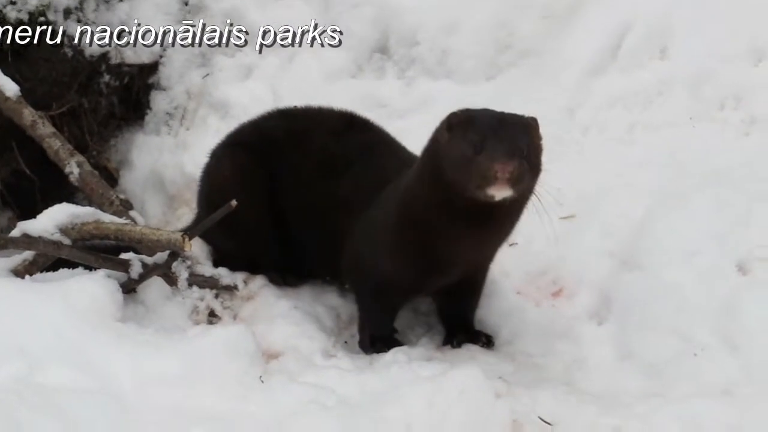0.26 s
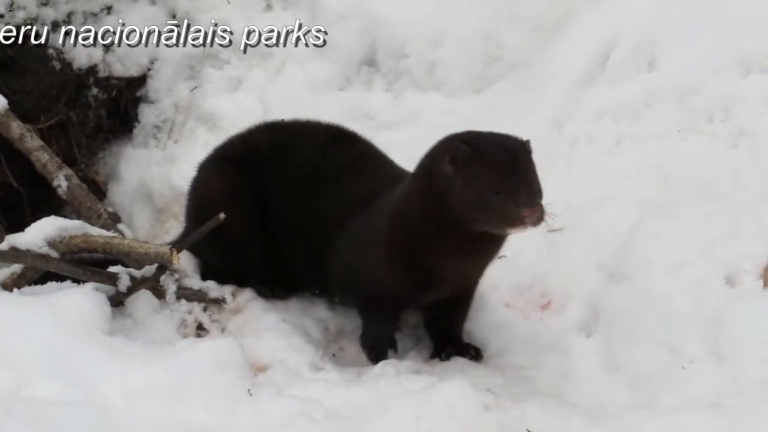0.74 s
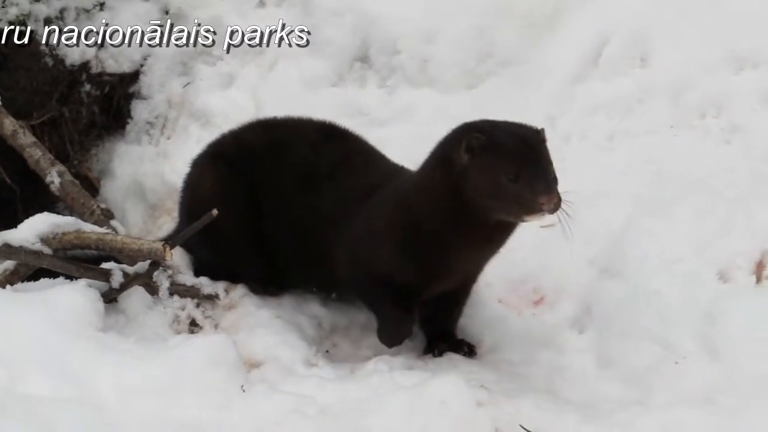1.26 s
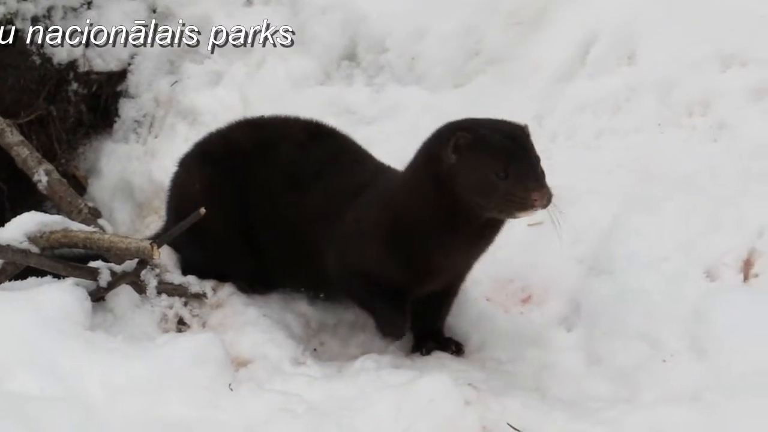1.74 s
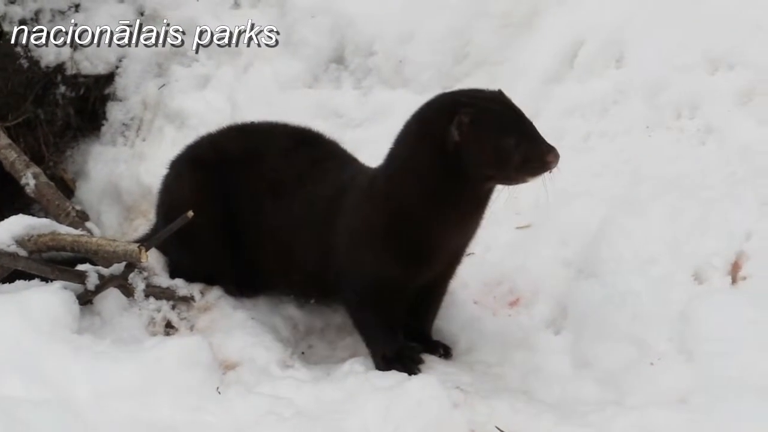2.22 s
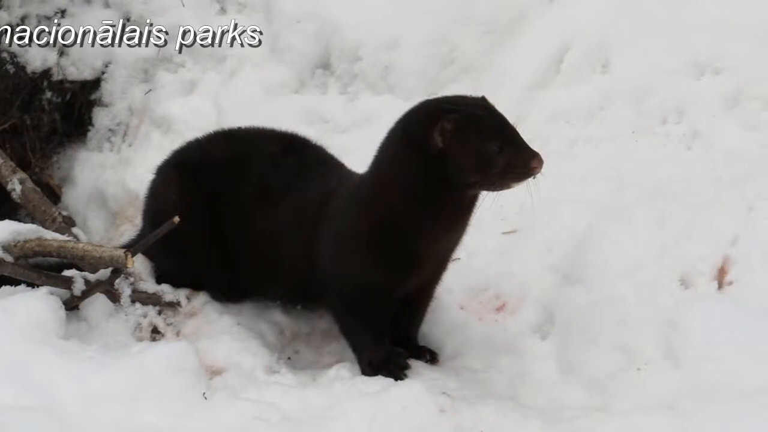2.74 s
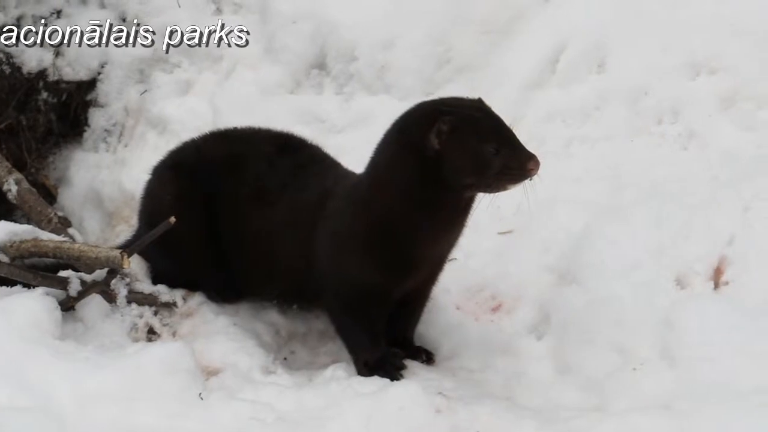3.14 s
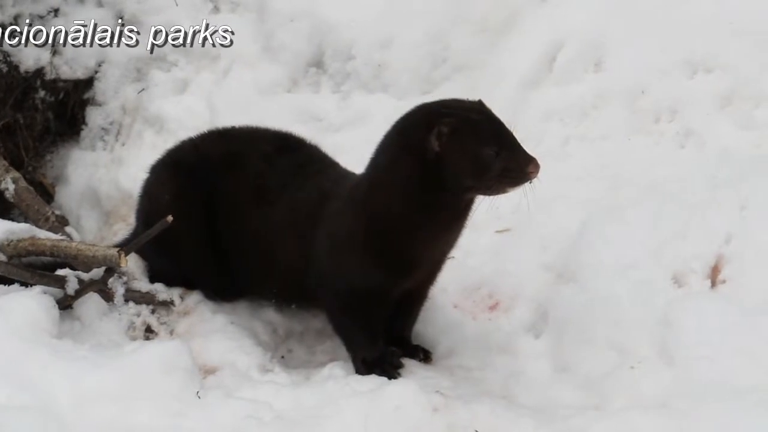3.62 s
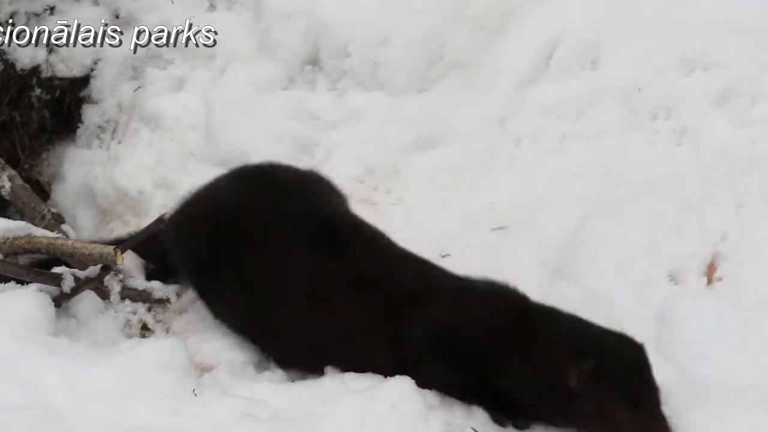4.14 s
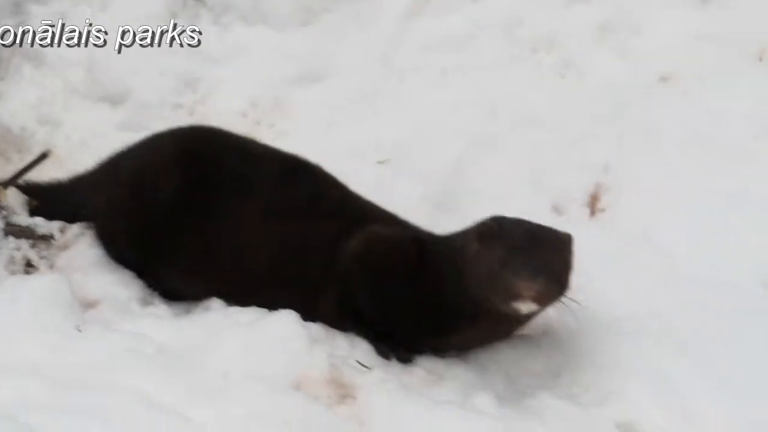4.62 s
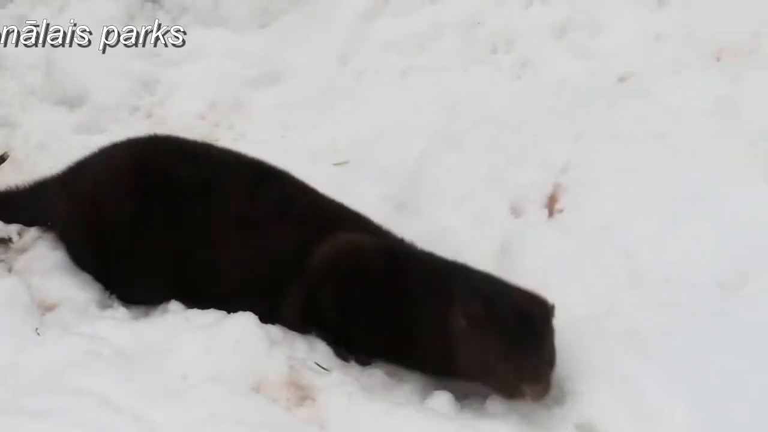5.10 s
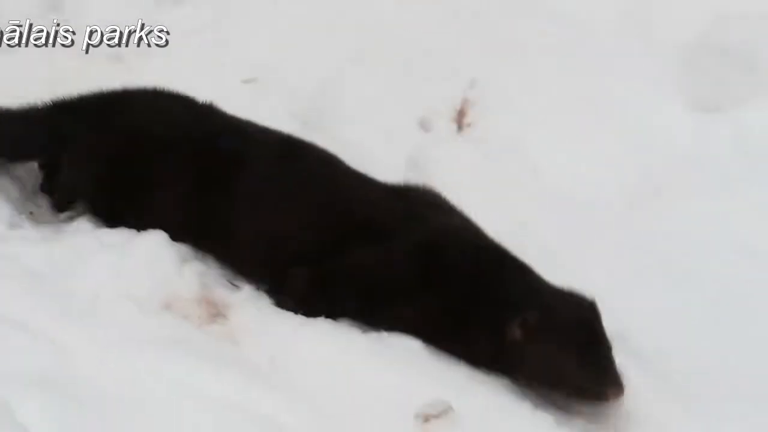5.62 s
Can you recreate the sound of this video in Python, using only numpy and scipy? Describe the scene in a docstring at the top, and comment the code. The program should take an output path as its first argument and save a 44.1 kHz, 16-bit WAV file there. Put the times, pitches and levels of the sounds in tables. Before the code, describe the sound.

A quiet snowy wood with steady soft hiss. Thin, high bird whistles recur at a distance, and soft low puffs of air nudge the stereo microphones. Isolated hard plastic snaps sound very close, at half a second and near two seconds. After four seconds a mink creeps off with faint crunchy scuffs, while the close clicks and creaks crowd into rapid clusters.

```python
"""From the start electronics hiss and whine, filtered noise and a sine, in a quiet winter wood where a mink stands.
Thin arched bird whistles come early and recur; soon a hard shell very close by, most likely the plastic housing
round the two microphones, creaks and snaps: bursts of force ring its modes. Puffs of low noise follow as air
nudges the microphones. From about 4 s the mink creeps off over crusted snow, in noise and dull ticks,
and the shell's clicks crowd into quick clusters."""
import sys
import numpy as np
from scipy import signal
from scipy.fft import rfft, irfft
from scipy.io import wavfile
from scipy.ndimage import map_coordinates

SR = 44100
rng = np.random.default_rng(int(sys.argv[2]) if len(sys.argv) > 2 else 0)


def unload_audio(sound):
    """Save the sound as a 16-bit wav file, at the path given as the first command line argument."""
    columns = np.transpose(np.atleast_2d(sound))
    # keep every value between -1 and 1, then stretch to whole-number steps
    steps = np.round(np.clip(columns, -1, 1) * 32767)
    wavfile.write(sys.argv[1], SR, steps.astype(np.int16))


N = 258426
TIME = np.arange(N) / SR


def from_db(db):
    """Decibels to gain."""
    return 10 ** (np.asarray(db) / 20)


def rms_one(x):
    """Scale to unit rms."""
    return x / np.sqrt(np.mean(x ** 2) + 1e-20)


def at_hz(points, hz):
    """Read a curve on a log-frequency axis."""
    curve_hz, values = np.transpose(points)
    return np.interp(np.log(hz), np.log(curve_hz), values)


def cut(x, hz, kind, order=2):
    """Butterworth filter."""
    return signal.sosfilt(signal.butter(order, hz, kind, fs=SR, output="sos"), x)


def sine(phase):
    """Sine of rms 1 from a phase in cycles."""
    return np.sqrt(2) * np.sin(2 * np.pi * phase)


def drift(knots_per_s):
    """Smooth random curve of rms 1 through so many random knots a second."""
    knots = rng.standard_normal(4096)
    steps_s = TIME[::32]
    curve = map_coordinates(knots, [steps_s * knots_per_s], order=3, mode="wrap")
    return np.interp(TIME, steps_s, rms_one(curve))


def resonate(x, hz, width_hz):
    """Two-pole resonance with gain 1 on top."""
    r = np.exp(-np.pi * width_hz / SR)
    zeros = np.array([1, 0, -1]) * (1 - r * r) / 2
    poles = [1, -2 * r * np.cos(2 * np.pi * hz / SR), r * r]
    return signal.lfilter(zeros, poles, x)


# left-right correlation of noise, before each source's factor: (f/Hz, correlation/1)
LEFT_RIGHT_LIKENESS = [(60, 1), (150, 0.8), (380, 0.5), (950, 0.37), (2380, 0.12), (5980, 0.03),
                       (15000, 0.09)]


def banded_noise(spectrum, patchy_db, patches_per_s, likeness, count):
    """Bands of stereo noise, each with its own level, flicker and left-right likeness; rms 1."""
    low_edge_hz, high_edge_hz = max(spectrum[0][0], 14), min(spectrum[-1][0], 17000)
    edges_hz = np.geomspace(low_edge_hz, high_edge_hz, count + 1)
    white = rng.standard_normal((2, 2, N))
    out = 0
    for k, (low_hz, high_hz) in enumerate(zip(edges_hz, edges_hz[1:])):
        mid, side = cut(white[k % 2], [low_hz, high_hz], "band")
        centre_hz = np.sqrt(low_hz * high_hz)
        alike = np.clip(likeness * at_hz(LEFT_RIGHT_LIKENESS, centre_hz), -1, 1)
        gain = from_db(at_hz(spectrum, centre_hz) + patchy_db * drift(patches_per_s))
        out = out + gain * (np.sqrt(1 + alike) * mid + np.sqrt(1 - alike) * side * [[1], [-1]])
    return rms_one(out)


def slip_force(t, t60_s, rise_s=0.00033, catches_per_s=9000, jolt=2.2, evenness=0.63, passes=4):
    """One slip: tiny catches swell to a jolt and die away, smeared in time but evened in spectrum."""
    swell = np.exp(np.minimum(t, 0) / rise_s)
    envelope = swell * from_db(-60 * np.maximum(t, 0) / max(t60_s, .001))
    caught = rng.random(len(t)) < catches_per_s / SR
    force = envelope * caught * rng.standard_normal(len(t))
    force[np.searchsorted(t, 0)] += jolt
    for _ in range(passes):
        spectrum = rfft(force)
        evened = spectrum / (np.abs(spectrum) + 1e-9) ** evenness
        force = irfft(evened, len(t)) * envelope ** 0.023
    return force


# shell modes, levels relative within each microphone, before tilt and scatter:
# (f/Hz, width/Hz, snap left level/dB, snap right level/dB, creak left level/dB, creak right level/dB)
SHELL_MODES = [(252, 490, -29, -67, -23, -16), (636, 48, -51, 4.5, 3.5, -36),
               (974, 140, -48, -76, -20, 3.5), (1318, 87, -17, 3.5, 4, -11),
               (1470, 150, 3, -12, -9.5, -11.5), (1930, 210, -2.5, 2.5, 2, -13),
               (2480, 183, 11.5, -3.5, -3, -5), (2805, 186, 8, 12, 2.5, -9), (3222, 240, 14, -37, 4, -11),
               (3980, 480, -7, -1, 3, -9), (4350, 350, -24, 3, 3.5, -31), (4750, 230, -12, -21, 3, -27),
               (5900, 540, -28, -5, -21, -5.5), (6790, 420, -9, -22, -26, -4),
               (8180, 560, -56, -67, -34, -0.5), (12000, 1900, -58, -5, -7.5, -56)]


def housing(force, creak, tilt_db_per_octave, scatter_db=1.5, detune=0.027,
            contact_hz=7000, edge_hz=9800, lowest_hz=190):
    """Force rings the shell's modes: in step on the right, with alternating signs on the left."""
    out = np.zeros((2, len(force)))
    for k, (hz, width_hz, *levels) in enumerate(SHELL_MODES):
        snap_db, creak_db = np.reshape(levels, (2, 2))
        level_db = snap_db + creak * (creak_db - snap_db)
        level_db = level_db + tilt_db_per_octave * np.log2(hz) + scatter_db * rng.standard_normal()
        mode = resonate(force, hz * (1 + detune * rng.standard_normal()), width_hz)
        out += np.outer(from_db(level_db) * [(-1) ** k, 1], mode)
    softened = cut(cut(out, contact_hz, "low", order=4), edge_hz, "low", order=4)
    return cut(softened, lowest_hz, "high")


# sharp snaps, louder on the right, levels over 4 ms before the trim:
# (t/s, level/dB, colour/1 from snap 0 to creak 1, tilt/(dB/octave), T60/s)
SHELL_SNAPS = [(0.5207, -28, 0.47, -0.5, 0.0077), (1.8273, -22, .02, 2.5, 0.012),
               (4.455, -43, 0.87, 2, .0074), (4.5287, -35, 0.054, -0.5, 0.0035),
               (4.564, -42, 0.66, -7, 0.0089), (5.3426, -23, 0.017, 4, .004), (5.551, -31, 0.18, 1, .003),
               (5.5972, -23.5, 0.054, 0.5, .004), (5.613, -37.5, 0.55, -7.5, 0.015),
               (5.8011, -34, 0.55, -6.5, .0054)]
# creaky clicks, the loud ones louder on the left, levels over 4 ms before the trim: (t/s, level/dB, T60/s)
SHELL_CREAKS = [(0.1042, -52, .016), (1.2218, -42, .01), (1.3739, -53.5, .012), (1.7416, -52, .009),
                (2.6621, -53, 0.016), (3.0286, -54, 0.017), (3.484, -54, 0.013), (3.6091, -54, .013),
                (4.2166, -54.5, .014), (4.3997, -42, .007), (4.4027, -34, 0.011), (4.436, -45, .01),
                (4.4381, -32.5, 0.011), (4.4477, -47, 0.046), (4.4962, -51, 0.013), (4.5756, -39, 0.0067),
                (4.5826, -32, 0.016), (4.5903, -40.7, 0.023), (4.6037, -47, 0.048), (4.651, -33, 0.016),
                (5.3335, -34.5, 0.014), (5.3677, -31, 0.013), (5.3847, -43.5, 0.025), (5.497, -58, .012),
                (5.585, -39.5, 0.063), (5.6078, -29.5, 0.024), (5.78, -50.5, .04), (5.7894, -28.5, 0.02)]
# pans are left minus right
SNAP_PAN_DB, CREAK_PAN_DB, CREAK_PAN_DB_PER_DB = -6, 5.5, 0.36
CREAK_COLOUR, CREAK_FULL_DB, CREAK_TILT_PER_DB = 0.96, -36.5, 0.51
CREAK_EVEN_S, CREAK_TILT_PER_DOUBLING = 0.018, 1  # a full creak with this T60 has no tilt


def slips():
    """Every slip of the shell with its pan, colour and tilt; soft or slow creaks are duller."""
    for s, level_db, colour, tilt, t60_s in SHELL_SNAPS:
        yield s, level_db, SNAP_PAN_DB, colour, tilt, t60_s
    for s, level_db, t60_s in SHELL_CREAKS:
        softer_db = max(CREAK_FULL_DB - level_db, 0)
        pan_db = CREAK_PAN_DB - CREAK_PAN_DB_PER_DB * softer_db
        doublings = np.log2(t60_s / CREAK_EVEN_S)
        tilt = -CREAK_TILT_PER_DB * softer_db - CREAK_TILT_PER_DOUBLING * doublings
        yield s, level_db, pan_db, CREAK_COLOUR, tilt, t60_s


def clicks(tail_db=-21, tail_t60_s=0.063, tail_low_hz=500, tail_high_hz=3000,
           knock_db=-19, knock_t60_s=0.037, knock_hz=290, knock_width_hz=200, trim_db=1.52):
    """Each slip rings the housing and leaves a short dull tail; a creak also knocks the whole shell."""
    lead, attack = SR // 200, SR // 250
    t = np.arange(-lead, SR // 12) / SR
    out = np.zeros((2, N + len(t)))
    for s, level_db, pan_db, creak, tilt, t60_s in slips():
        ring = housing(slip_force(t, t60_s), creak, tilt)
        ring /= np.sqrt(np.sum(ring[:, :lead + attack] ** 2, axis=1, keepdims=True) / attack)
        tail = rms_one(cut(rng.standard_normal((2, len(t))), [tail_low_hz, tail_high_hz], "band"))
        tail = tail * from_db(tail_db - 60 * t / tail_t60_s)
        # the low knock moves both microphones together
        knock = rms_one(resonate(rng.standard_normal(len(t)), knock_hz, knock_width_hz))
        knock = creak * knock * from_db(knock_db - 60 * t / knock_t60_s)
        sides = rms_one(from_db([[pan_db / 2], [-pan_db / 2]]))
        click = sides * ring + (t > 0) * (tail + knock)
        start = int(s * SR) - lead
        out[:, start:start + len(t)] += from_db(level_db + trim_db) * click
    return out[:, :N]


def crumbs(per_s=70, spread_db=4, low_hz=500, high_hz=2200, width_hz=350, count=8):
    """Grains of crust give way at random, each a short dull tick at one of a few pitches; rms 1."""
    sizes_db = spread_db * np.minimum(rng.exponential(1, N), 3)
    grains = (rng.random(N) < per_s / SR) * from_db(sizes_db)
    dealt = rng.integers(0, count, N)
    ticks = 0
    for k, hz in enumerate(np.geomspace(low_hz, high_hz, count)):
        ticks = ticks + resonate(grains * (dealt == k) + 1e-18, hz, width_hz)
    return rms_one(ticks)


# paws and belly on the crust, before the shares of rustle and crumbs: (t/s, level/dB)
SCUFF_LEVEL = [(0, -108), (4.2, -67.5), (4.45, -63), (4.75, -65), (4.98, -63), (5.2, -63), (5.3, -63),
               (5.5, -59), (5.7, -62.5), (5.86, -66)]
# relative density: (f/Hz, level/(dB per Hz))
SCUFF_SPECTRUM = [(200, 1), (450, -10), (620, 5), (800, -9), (1000, -2.5), (1200, 10.5), (1600, -19),
                  (3000, -13), (8000, -11.5)]


def paws(rustle_db=-2.5, crumbs_db=-8.5):
    """Paws and belly scuff the crust: patchy noise with crumbling grains, under one level curve."""
    rustle = banded_noise(SCUFF_SPECTRUM, patchy_db=4.0, patches_per_s=76, likeness=1.0, count=14)
    level_db = np.interp(TIME, *np.transpose(SCUFF_LEVEL))
    return from_db(level_db) * (from_db(rustle_db) * rustle + from_db(crumbs_db) * crumbs())


# direct sound, before fades, flutter and echoes: (t/s, length/s, top pitch f/Hz, level/dB)
CALLS = [(.025, .06, 7300, -74), (1.406, 0.033, 6840, -69), (1.896, .045, 6800, -71),
         (1.993, 0.16, 7720, -62.5), (2.262, 0.059, 6840, -67.5), (2.555, 0.069, 6850, -68.5),
         (2.82, .045, 6840, -74), (3.471, 0.15, 7840, -59), (4.152, .025, 6450, -71),
         (4.307, .024, 6760, -65.5), (5.145, .035, 7430, -69), (5.79, .045, 8100, -69)]
CREST_SHARE, ARCH_HZ_PER_S = 0.62, 2160  # pitch tops out this far into a call; longer calls start lower
ATTACK_SHARE, RELEASE_SHARE = 0.15, 0.36  # of a call's length
WOOD_T60_S = .3


def birds(waver_hz=70, flutter_db=3.0, echo_db=-7, count=24):
    """Thin wavering whistles, each an arch of pitch, scattered by the trunks on their way."""
    song = np.zeros(N)
    waver, flutter = waver_hz * drift(250), flutter_db * drift(120)
    for s, length_s, top_hz, level_db in CALLS:
        now = (TIME > s) & (TIME < s + length_s)
        along = (TIME[now] - s) / length_s
        hz = top_hz - ARCH_HZ_PER_S * length_s * (along / CREST_SHARE - 1) ** 2
        fade = np.clip(np.minimum(along / ATTACK_SHARE, (1 - along) / RELEASE_SHARE), 0, 1)
        whistle = sine(np.cumsum(hz + waver[now]) / SR)
        song[now] += fade * from_db(level_db + flutter[now]) * whistle
    out = np.array([song, song])
    for side in out:
        for delay_s in rng.uniform(0.0044, 0.091, count):
            lag = max(int(delay_s * SR), 1)
            side[lag:] += song[:-lag] * from_db(echo_db - 60 * delay_s / WOOD_T60_S) / 2
    return out


# puffs of air, before the sway and flutter trims: (peak t/s, peak level/dB, swell time constant/s)
PUFFS = [(.85, -65, .06), (1.14, -62.5, 0.035), (1.39, -55, .06), (1.61, -60.5, 0.051), (1.81, -60.5, .045),
         (3.16, -57, 0.038), (3.49, -60.5, 0.075), (3.675, -53.5, 0.022), (3.84, -64, 0.064),
         (4.5, -56.5, 0.096), (4.87, -53, 0.074), (5.01, -48.5, 0.059), (5.28, -64, 0.092),
         (5.54, -60, 0.067)]
PUFF_FALL_RATIO = 1.28  # fall time over swell time


def airflow(calm_db, lag_s):
    """Strength of the moving air: puffs swell and die away over a calm."""
    power = from_db(calm_db) ** 2
    for s, peak_db, swell_s in PUFFS:
        t = TIME - s - lag_s
        puff = np.exp(-np.maximum(-t, t / PUFF_FALL_RATIO) / swell_s)
        power = power + (from_db(peak_db) * puff) ** 2
    return np.sqrt(power)


# relative density: (f/Hz, level/(dB per Hz))
SWAY_SPECTRUM = [(18, 0.5), (30, 3.5), (45, -4.5), (58, -3)]
# relative density: (f/Hz, level/(dB per Hz))
FLUTTER_SPECTRUM = [(52, -0.5), (70, 4.5), (100, -11), (150, -12.5), (260, -28)]


def buffeting(sway_trim_db=1.3, flutter_trim_db=2.5):
    """Slow eddies lag the quicker flutter, which is more alike at both microphones."""
    sway = banded_noise(SWAY_SPECTRUM, patchy_db=-0.5, patches_per_s=10.0, likeness=0.17, count=3)
    flutter = banded_noise(FLUTTER_SPECTRUM, patchy_db=1.0, patches_per_s=9.1, likeness=0.54, count=5)
    # calm levels before trim
    sway = airflow(calm_db=-78.5, lag_s=0.012) * sway
    flutter = airflow(calm_db=-71.5, lag_s=0) * flutter
    return from_db(sway_trim_db) * sway + from_db(flutter_trim_db) * flutter


# still air and hiss, relative density: (f/Hz, level/(dB per Hz))
HUSH_SPECTRUM = [(59, -24), (100, -3.5), (214, -11.5), (438, -6), (576, -7.5), (917, -7.5), (998, -5.5),
                 (1130, -13), (1550, -11), (2990, -11.5), (4860, -13), (6810, -15.5), (7410, -16),
                 (8770, -17), (15500, -26)]
# faint hollow tones: (f/Hz, width/Hz, level/dB)
HOLLOW_TONES = [(1169, 98, -73), (1384, 66, -79), (2936, 100, -76)]


def still_air_and_hiss(level_db=-60.5):
    """Slightly flickering broadband noise, with faint hollow tones from narrow resonances."""
    noise = banded_noise(HUSH_SPECTRUM, patchy_db=1.0, patches_per_s=12, likeness=1.0, count=22)
    hush = from_db(level_db) * noise
    for hz, width_hz, tone_db in HOLLOW_TONES:
        tone = rms_one(resonate(rng.standard_normal((2, N)), hz, width_hz))
        hush = hush + from_db(tone_db) * tone
    return hush


def whine(hz=8800, level_db=-88):
    """The electronics whine: one steady sine."""
    return from_db(level_db) * sine(hz * TIME)


def scene():
    """Clicks up close, paws and birds farther off, over moving air, hush and whine."""
    return clicks() + paws() + birds() + buffeting() + still_air_and_hiss() + whine()


def record(dry, cutoff_hz=15800):
    """A steep elliptic low-pass cuts the top."""
    return signal.sosfilt(signal.ellip(10, .1, 70, cutoff_hz, fs=SR, output="sos"), dry)


dry = scene()
out = record(dry)
unload_audio(out)
```